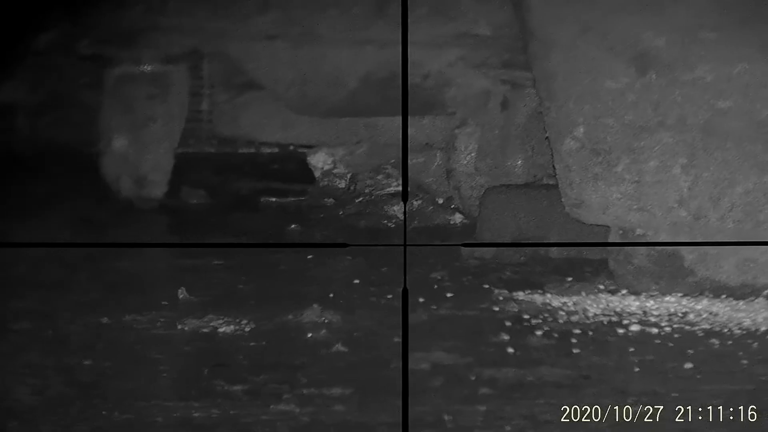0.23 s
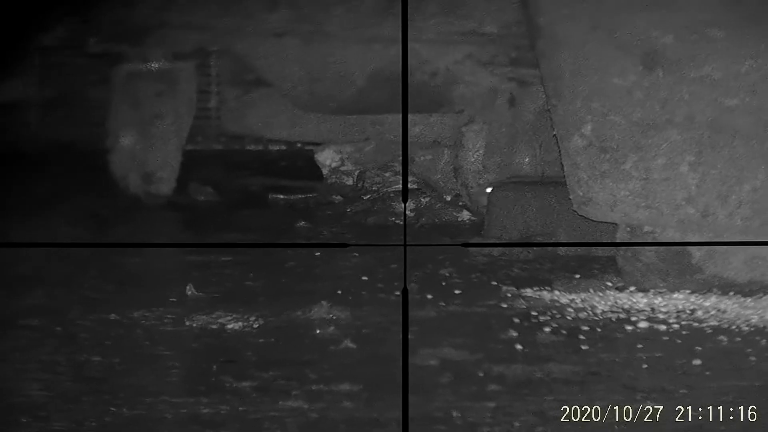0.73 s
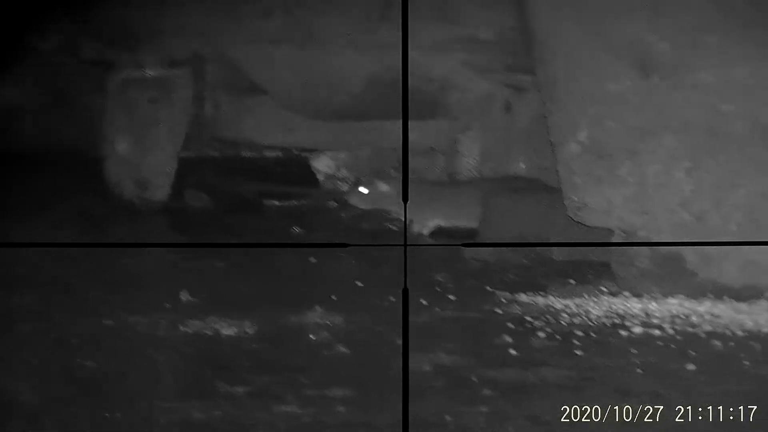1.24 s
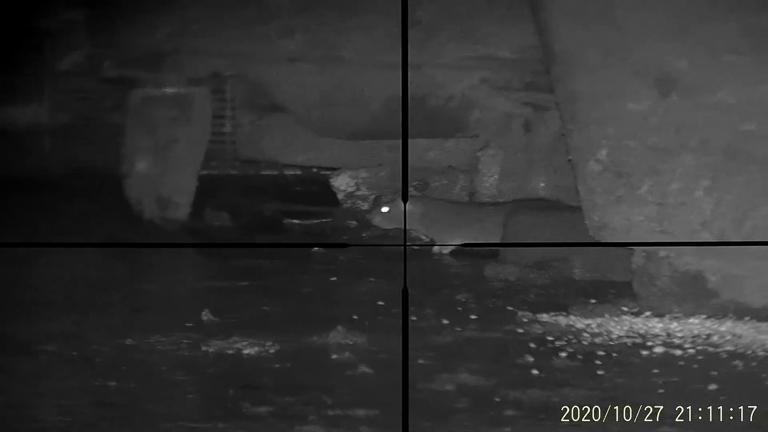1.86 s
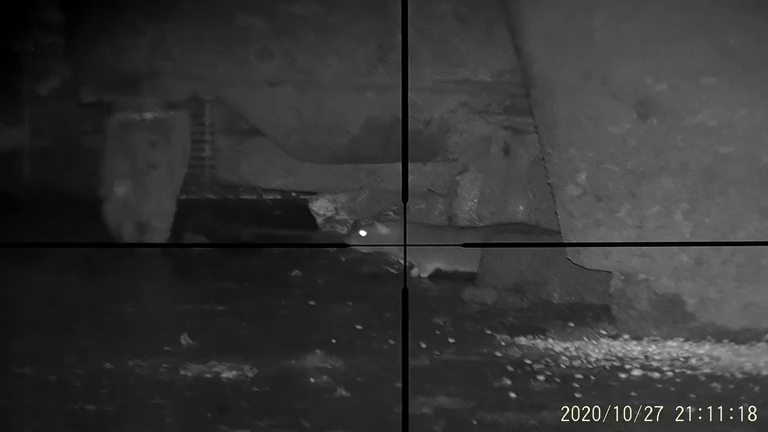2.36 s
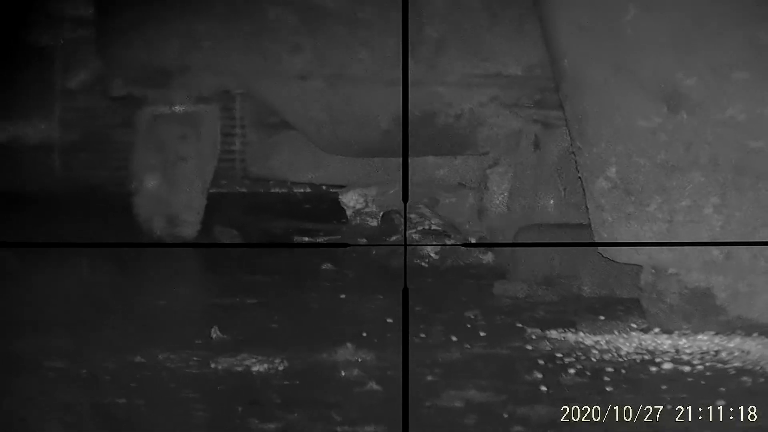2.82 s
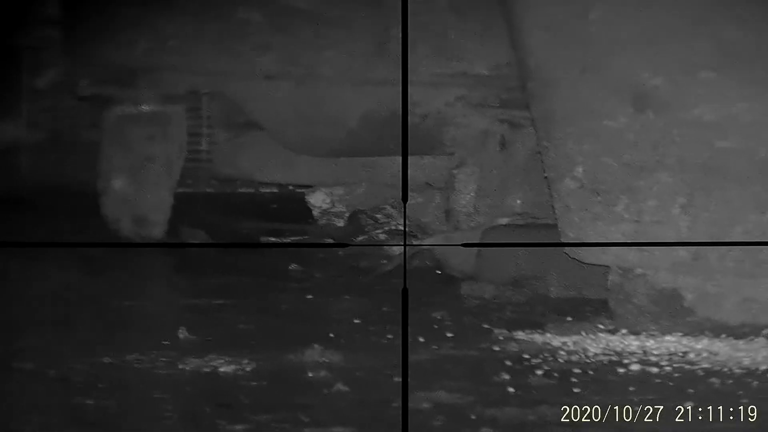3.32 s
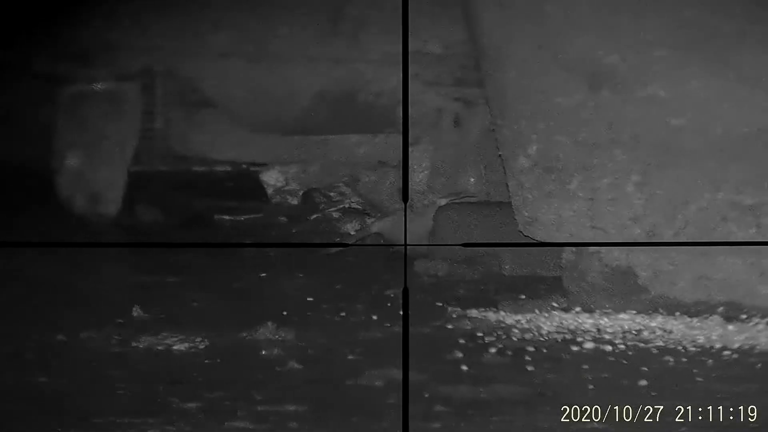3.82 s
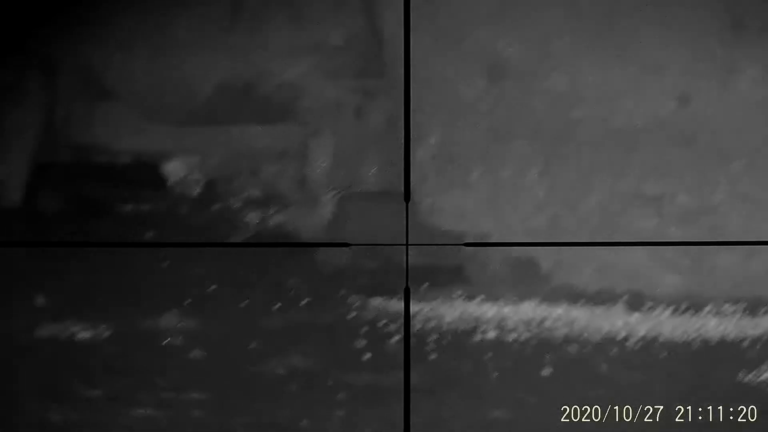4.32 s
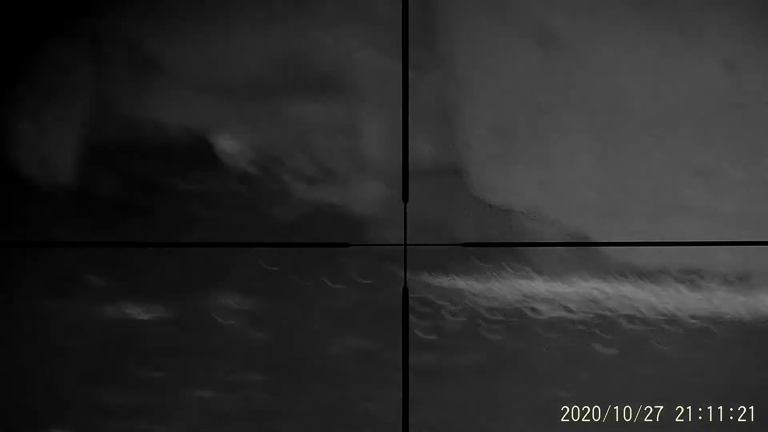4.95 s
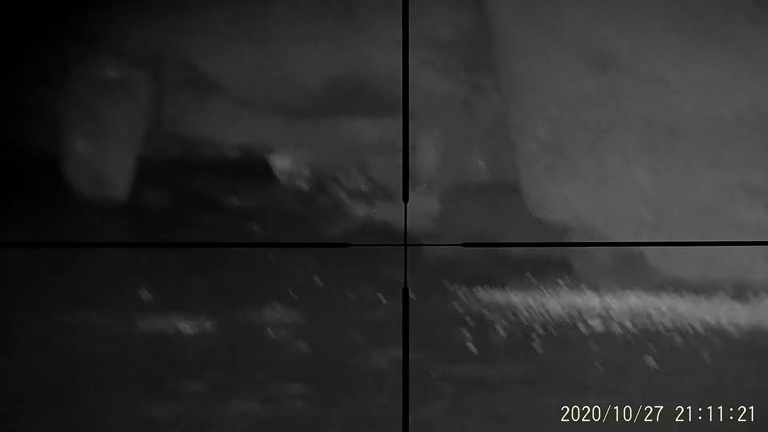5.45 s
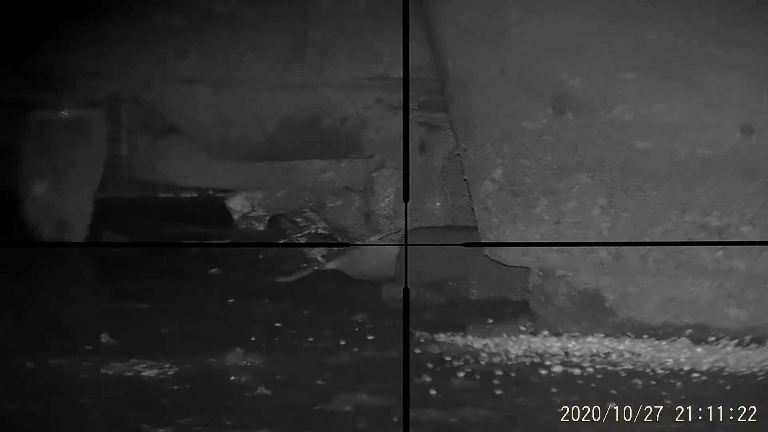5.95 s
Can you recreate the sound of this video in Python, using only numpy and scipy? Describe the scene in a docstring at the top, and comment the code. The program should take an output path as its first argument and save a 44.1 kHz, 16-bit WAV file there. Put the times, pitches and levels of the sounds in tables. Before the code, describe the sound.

Heard from a microphone mounted on the rifle, in a quiet yard at night. For the first 2.5 seconds there is only low, lumpy handling rumble, soft hush and very thin high electronic whine, with a small dull tap near 1.35 and a barely audible nudge at 2.1. At 2.57 the air rifle fires: a huge, clipped, rattling burst of air lasting under a tenth of a second, bright then dull, leaving a short hollow steel ring and shaking low rumble. The hush swells afterwards. A sharp single clack comes at 3.03, a softer one at 3.14, then faint rubs and taps from 3.55 to 4.1. From 4.28 to 4.52 the bolt is worked with scraping, hard clacks and a tiny squeal near 4.43. Lighter clicks follow around 4.65 to 4.74, another strong clatter at 4.95 to 5.03, small knocks at 5.25 to 5.4, and soft rubbing fading into rumble and hush by 6.2.

```python
"""Air rifle shot at night

In a quiet yard an air rifle with a camera scope bolted to it fires once, then its bolt is worked.
The shot is coloured noise gated by a valve and its rebounds; contacts and friction excite damped modes
of stock and action, shot and contacts ring the steel cylinder and barrel, and the bolt squeals by
stick-slip. Rumble, hush and whine lie behind; the recorder ducks its gain and clips the hardest blows."""
import sys
import numpy as np
from scipy import signal
from scipy.fft import rfft, irfft, next_fast_len
from scipy.io import wavfile
from scipy.ndimage import uniform_filter1d, map_coordinates

SR = 44100
rng = np.random.default_rng(int(sys.argv[2]) if len(sys.argv) > 2 else 0)


def wrap_up_sound(samples):
    """Save the sound to the file named by the first command line argument, as 16-bit audio."""
    columns = np.atleast_2d(samples).T
    # keep every value between -1 and 1, then stretch to whole-number steps
    tamed = np.clip(columns, -1, 1)
    steps = np.round(tamed * 32767).astype(np.int16)
    wavfile.write(sys.argv[1], SR, steps)


N = 272516
T = np.arange(N) / SR  # time of each sample, s
SHOT_S = 2.573


def amp(db):
    """Level to amplitude: 20 dB is a factor of ten."""
    return 10 ** (np.asarray(db) / 20)


def unit(x):
    """Normalization to an rms of 1."""
    return x / np.sqrt(np.mean(x ** 2) + 1e-20)


def curves(rows):
    """Linear interpolation of each column over time, then a gate that is open inside the table."""
    s, *columns = np.transpose(rows)
    return [np.interp(T, s, column) for column in columns] + [(T > s[0]) & (T < s[-1])]


def wobble(rate_hz):
    """Slow random modulation: a smooth curve through rate_hz random knots a second."""
    knots = rng.standard_normal(int(N * rate_hz / SR) + 4)
    return map_coordinates(knots, [T * rate_hz])


def filtered(x, response):
    """Linear filtering: the spectrum is multiplied by a response of frequency."""
    size = next_fast_len(N + SR // 2)
    hz = np.fft.rfftfreq(size, 1 / SR)
    return irfft(rfft(x, size) * response(hz), size)[:N]


def noise(points):
    """Spectral shaping: white noise coloured by (f/Hz, level/dB) points and brought to rms 1."""
    f, db = np.transpose(points)
    colour = lambda hz: amp(np.interp(np.log(hz + 1), np.log(f + 1), db))
    return unit(filtered(rng.standard_normal(N), colour))


# Level of the handling rumble: t/s, level/dB
HANDLING_LEVEL = [(0, -61), (1.1, -53.5), (2.1, -64), (2.6, -59), (4.2, -55.5), (6.18, -58)]
# Jolts of the rifle on its rest: t/s, level/dB
REST_JOLTS = [(2.086, -47), (2.17, -49), (4.35, -41), (4.519, -41), (5.03, -40.5)]
# Relative spectrum of the rumble: f/Hz, level per Hz/dB
RUMBLE_COLOUR = [(7.1, -26), (12, 0.5), (60, 1), (168, -9), (195, -10), (300, -18.5), (390, -53),
                 (660, -120)]
JOLT_HALF_S = 0.037
RECOIL_DB, RECOIL_DB_PER_S = -28.5, 129.5  # the rifle shakes after the shot


def handling_rumble():
    """Amplitude modulation: lumpy low noise follows the handling, the jolts and the decaying recoil."""
    level = amp(curves(HANDLING_LEVEL)[0])
    level += sum(amp(db) * np.exp(-((T - s) / JOLT_HALF_S) ** 2) for s, db in REST_JOLTS)
    level += (T > SHOT_S) * amp(RECOIL_DB - RECOIL_DB_PER_S * np.abs(T - SHOT_S))
    return level * unit(amp(3.0 * wobble(32)) * noise(RUMBLE_COLOUR))


# Relative spectrum of the yard's hush: f/Hz, level/dB
YARD_COLOUR = [(60, -26), (100, -5), (340, -5), (3760, -25.5), (7400, -26.5), (9900, -18.5), (12600, -20),
               (13500, -10.5), (14300, -21.5), (15900, -26.5)]
# Tones from the electronics of the scope: f/Hz, rms level before the swell/dB
SCOPE_WHINE = [(4032, -75.5), (8064, -72), (9297, -73.5), (13329, -66.5)]
# Gain of hush and whine, which swell after the shot: t/s, gain/dB
SWELL_GAIN = [(0, 2.5), (2.6, 1.5), (2.9, 8.5), (5.6, 8), (6.18, 1.5)]


def hush_and_whine():
    """Superposition: broadband hush and pure electronic tones rise and fall under one gain."""
    hush = amp(-59.5 + 1.2 * wobble(2.5)) * noise(YARD_COLOUR)
    whine = sum(np.sqrt(2) * amp(db + 1.4 * wobble(60)) * np.sin(2 * np.pi * hz * T)
                for hz, db in SCOPE_WHINE)
    return amp(curves(SWELL_GAIN)[0]) * (hush + whine)


# Faint brief whistles: t/s, half length/s, f/Hz, half width/Hz, level/dB
FAINT_WHISTLES = [(2.92, .008, 1380, 60, -44), (4.39, .014, 2440, 50, -33), (5.68, .03, 2900, 250, -60)]


def whistles():
    """Narrow-band filtering: noise in a band tens to hundreds of hertz wide is heard as a breathy tone."""
    out = np.zeros(N)
    for s, half_s, hz, width_hz, db in FAINT_WHISTLES:
        band = lambda f: np.exp(-((f - hz) / width_hz) ** 2)
        tone = unit(filtered(rng.standard_normal(N), band))
        out += amp(db) * np.exp(-((T - s) / half_s) ** 2) * tone
    return out


# Stick-slip rate of the bolt: t/s, slips a second f/Hz
SLIP_RATE = [(4.398, 999), (4.405, 1289), (4.416, 1415), (4.422, 1927), (4.428, 2097), (4.456, 1430),
             (4.463, 1321), (4.466, 1200)]
# Overtones of the slip rate: multiple, level/dB
SLIP_OVERTONES = [(2, -44), (3, -40), (4, -50)]
# Relative spectrum of the rasp: f/Hz, level per Hz/dB
RASP_COLOUR = [(700, -20), (2500, 0), (6500, -6), (9000, -30)]
SQUEAL_DB, PRESS_DB_PER_S, FADE_S = -12, 130.5, .004  # the grip tightens, so the level climbs
SING_HZ, SING_WIDTH_HZ, OFF_DB = 1380, 71, -25  # the action sings in this band; floor away from it
RASP_DB = -36  # grit thrown off once a slip


def squeal():
    """Stick-slip: a gliding tone peaks at the singing pitch, with weak ragged overtones and rasp."""
    hz, gate = curves(SLIP_RATE)
    gate = uniform_filter1d(gate * 1., size=round(FADE_S * SR))
    resonance = 1 / (1 + ((hz - SING_HZ) / SING_WIDTH_HZ) ** 2) + amp(OFF_DB)
    sing = amp(SQUEAL_DB + PRESS_DB_PER_S * (T - SLIP_RATE[0][0]) * gate) * resonance
    phase = 2 * np.pi * np.cumsum(hz * (1 + 0.027 * wobble(400))) / SR
    tone = sing * amp(1.1 * wobble(490)) * np.sin(phase)
    overtones = sum(amp(db + 6.9 * wobble(300)) * np.sin(k * phase) for k, db in SLIP_OVERTONES)
    rasp = amp(RASP_DB + 3.3 * wobble(100)) * (1 + np.cos(phase)) * noise(RASP_COLOUR)
    return np.sqrt(2) * gate * (tone + overtones + rasp)


def stock(x):
    """Structure-borne transmission: a short room tail blurs the sound, and stock and mount remove deep bass and
    top."""
    t = T[:SR // 3]
    colour = [(150, -30.5), (300, 2.5), (500, 4.5), (1500, -11.0), (2500, -29.5)]  # f/Hz, level/dB
    tail = noise(colour)[:len(t)] * amp(-60 * t / 0.065)
    x = x + amp(-18) * signal.fftconvolve(x, tail / np.linalg.norm(tail))[:N]
    high_pass = lambda hz: (1j * hz / (90 + 1j * hz)) ** 2
    low_pass = lambda hz: 1 / (1 - (hz / 7500) ** 2 + 1.1j * hz / 7500) ** 3
    return filtered(x, lambda hz: high_pass(hz) * low_pass(hz))


# Five groups of short resonances of stock and action, each: f/Hz, T60/s, level/dB
CLACK_MODES = [(1224, 0.022, -5), (1380, 0.026, 0)]
CLONK_MODES = [(850, .035, -3), (977.5, 0.045, 0), (1457, .4, -46), (1547, .3, -43)]
THUD_MODES = [(141, 0.094, -17), (341.9, 0.07, -4), (379.3, 0.08, 2), (400, 0.39, -11), (480.7, 0.093, 1.5)]
KNOCK_MODES = [(750, .033, 0)]
TICK_MODES = [(2823, 0.0091, 8.5), (3626, 0.011, 0), (4206, 0.0056, 2.5), (4780, 0.0059, 3.5),
              (6346, 0.014, -8)]


def ring(modes):
    """Modal superposition: the answer of damped resonances to one soft-edged tap."""
    t = T[:SR // 2]
    out = np.zeros(len(t))
    for hz, t60, db in modes:
        soft_edge = 1 - np.exp(-.8 * hz * t)
        out += amp(db - 60 * t / t60) * soft_edge * np.sin(2 * np.pi * hz * t)
    return out


# Strokes of hands and bolt: t/s, length/s, level at start/dB, level at end/dB, treble over these/dB
RUB_STROKES = [(3.555, 0.041, -48, -48, -17), (3.605, 0.068, -42.5, -43, -18), (3.754, 0.03, -50, -54, -23),
               (3.987, 0.097, -54, -43, -13), (4.288, .07, -45.5, -20.5, -10.5),
               (4.355, .11, -28.5, -25.5, -17.5), (4.485, 0.027, -24, -19.5, -9.5),
               (4.646, 0.09, -46, -40, -12), (4.955, 0.076, -29.5, -19, -8.5),
               (5.245, 0.09, -39, -50.5, -5.5), (5.33, 0.33, -54, -61, -7.5)]
RUB_IN_DB_PER_S, RUB_OUT_DB_PER_S = 2998, 700.5


def rubbing():
    """Friction excitation: gritty noise continuously shakes the resonances that the contacts strike."""
    pushes, bright = np.zeros(N), np.zeros(N)
    for s, length_s, start_db, end_db, treble_db in RUB_STROKES:
        level = np.interp(T, [s, s + length_s], [start_db, end_db])
        level -= RUB_IN_DB_PER_S * np.clip(s - T, 0, None)
        level -= RUB_OUT_DB_PER_S * np.clip(T - s - length_s, 0, None)
        pushes += amp(level)
        bright += amp(level + treble_db)
    grit = unit(rng.standard_normal(N) * amp(4.7 * wobble(300)))
    weights = ((CLACK_MODES, -2), (CLONK_MODES, -2), (THUD_MODES, -1), (KNOCK_MODES, -6))  # dB
    body = sum(amp(db) * unit(ring(modes)) for modes, db in weights)
    shaken = signal.fftconvolve(pushes * grit, body)
    shaken += signal.fftconvolve(bright * grit, unit(ring(TICK_MODES)))
    return stock(shaken[:N] / np.linalg.norm(body))


# Modes of the steel cylinder and barrel: f/Hz
STEEL_MODE_HZ = [246.2, 313.3, 407, 437, 469.3, 484.6, 570.2, 829, 939.5, 1026, 1419, 1547, 2361, 2643,
                 2817, 2939, 3547, 4950, 1174, 1712, 2455]
# For each of these modes: T60/s, level after the shot/dB, level after a contact/dB
STEEL_DECAY = [(3.2, -36, -19.5), (1.6, -30.5, -4), (1, -23, 3.5), (.36, 2, -22), (1.5, -21, -7),
               (5.15, -29, -18.5), (0.89, -3.5, -0.5), (0.41, -21.5, -18.5), (3.6, -37, -9.5),
               (0.5, -24, -31), (0.33, -9, -20), (0.11, -9.5, -5.5), (.8, -35, -30), (0.35, -20, -29),
               (.9, -25.5, -33.5), (1.4, -46, -36), (0.76, -41, -39), (0.13, -10.5, -34.5),
               (0.28, -21.5, -30), (0.24, -24.5, -30), (1, -40, -39)]
FLUTTER_DB = 3  # loose parts make each mode waver, fully from 2 kHz up and less below


def steel(column):
    """Free vibration: cylinder and barrel ring on after a blow, at the levels of the given column."""
    t = T[:4 * SR]
    flutter = wobble(30)[:4 * SR]
    modes = np.zeros(len(t))
    for hz, mode in zip(STEEL_MODE_HZ, STEEL_DECAY):
        depth_db = FLUTTER_DB * min(hz / 2000, 1) ** 2
        waver_db = depth_db * np.roll(flutter, round(9 * hz))  # shifted, so the modes waver apart
        modes += amp(mode[column] - 60 * t / mode[0] + waver_db) * np.sin(2 * np.pi * hz * t)
    return modes * (1 - np.exp(-t / 0.0025)) * np.clip(t[::-1] / .3, 0, 1)


# Contacts in the action: t/s, clack peak level before the stock/dB, then relative to the clack:
# clonk level/dB, thud level/dB, knock level/dB, tick level/dB; chatter T60/s (held to 0.002 or more)
ACTION_CONTACTS = [(1.353, -27.5, -4.5, -1.5, -19, -12, 0.046), (2.171, -49, -3, -6.5, -8, -10, 0.031),
                   (3.025, -2.5, -9, -23, -35, -9.5, 0.0058), (3.139, -22.5, 5, -8, -22, -10, 0.023),
                   (3.601, -32, -3, 1.5, -29, -12, 0.022), (3.837, -51.5, -3, 19, 7, -14.5, 0.0067),
                   (3.982, -37, 0, 2.5, -15, -18, 0.0019), (4.094, -24.5, -5, 0, -20, -1.5, 0.012),
                   (4.283, -27, -4, -4.5, -16, -12.5, .006), (4.318, -25.5, -4, -14.5, -37, -11, .008),
                   (4.338, -6.5, -3.5, -14.5, -15, -7.5, 0.045), (4.347, 5.5, -6, -8, -13.5, 1, 0.0085),
                   (4.426, -5, -1, -22.5, -26, -6, 0.0076), (4.485, -19.5, -2.5, -5, -10, -4, 0.014),
                   (4.494, -16.5, -3, 0, -3.5, -5, .013), (4.502, -9, -6.5, -27.5, -11, 0.5, 0.0052),
                   (4.516, 3.5, -14.5, -21.5, 6, 8, 0.023), (4.653, -25.5, -2, -10.5, -14.5, -21, 0.023),
                   (4.664, -10.5, -9, -4.5, -23, -7.5, 0.012), (4.693, -27.5, -3, -14.5, -20, 1.5, 0.008),
                   (4.719, -20, -3, -17.5, -31, -19, 0.027), (4.737, -29.5, -5.5, -14, -28, -4, 0.019),
                   (4.956, -9.5, -8.5, -23, -27.5, -9, 0.011), (4.968, -17, -9, -21, -20, -7, 0.018),
                   (4.983, -11, -4, -6.5, -20, -15, .015), (4.999, -6.5, 4, -13, -22, -5.5, 0.0083),
                   (5.026, 4, 3, -4, 2.5, -2.5, 0.025), (5.253, -22, -5.5, -16, -27, 5, 0.015),
                   (5.272, -11.5, -3, 0.5, -10, -3.5, 0.015), (5.304, -53, 0, 28.5, -9, -10, .006),
                   (5.394, -24.5, -3.5, 8.5, -4, -12, 0.014)]
FIRST_TAP = 5  # added to the first tap; the taps that follow are random with rms 1 before decay
RING_CLACK_DB, RING_THUD_DB = -42, -45  # how much of a clack and of a thud goes into the steel


def action():
    """Impact excitation: each contact is a short chatter of taps, heard through five mode groups."""
    out, blows, t = np.zeros(N + SR), np.zeros(N), T[:SR // 16]
    groups = [ring(g) for g in (CLACK_MODES, CLONK_MODES, THUD_MODES, KNOCK_MODES, TICK_MODES)]
    for s, db, clonk_db, thud_db, knock_db, tick_db, t60 in ACTION_CONTACTS:
        start = round(s * SR)
        chatter = amp(-60 * t / max(t60, .002)) * rng.standard_normal(len(t))
        chatter[0] += FIRST_TAP
        push = np.abs(chatter)  # the wood feels the force of the blow, not its grain
        levels = (0, clonk_db, thud_db, knock_db, tick_db)
        forces = (chatter, chatter, push, chatter, chatter)
        for group, level, force in zip(groups, levels, forces):
            sound = signal.fftconvolve(group, force)
            out[start:][:len(sound)] += amp(db + level) * sound / np.abs(sound).max()
        blows[start] = amp(db + RING_CLACK_DB) + amp(db + thud_db + RING_THUD_DB)
    return stock(out[:N]) + signal.fftconvolve(blows, steel(column=2))[:N]


# Relative spectrum of the blast: f/Hz, level/dB
BLAST_SPECTRUM = [(24, -68.5), (40, -41.5), (130, -44), (200, -40), (277, -1.5), (620, -10.5), (710, 1),
                  (866, -20), (1320, -2), (1610, -28.5), (2100, -29), (2750, -15), (3600, -24),
                  (4900, -22.5), (6140, -24), (8300, -37), (9500, -62)]
# Hammer and valve rebounds: t/s
REBOUND_TIMES = [2.573, 2.578, 2.583, 2.589, 2.599, 2.608, 2.615, 2.621]
REBOUND_S, REBOUND_DECAY_S = 0.00018, 0.00064  # rise and decay constant of each rebound
LEAD_S, LEAD_DB = .007, -14.5  # a hiss of the opening valve runs ahead of the shot
BLAST_DB, BUILD_DB, HOLD_S = 22, 3.5, .03  # level before the rattle; starts BUILD_DB lower, builds in HOLD_S
CLOSE_S = .045  # the valve shuts ever faster, 60 dB down after this time
TAIL_DB, TAIL_DB_PER_S = 1, 200  # the escaping air dies slowly
TREBLE_DB, DULL_DB_PER_S = 7, 152.5  # the blast starts bright and dulls


def shot():
    """Turbulent jet noise: a rattling blast far above what the recorder can hold, then the steel ring."""
    t = T - SHOT_S
    after = np.clip(t - HOLD_S, 0, None)
    build_db = BUILD_DB * np.clip(1 - t / HOLD_S, 0, 1) ** 2
    valve = amp(BLAST_DB - build_db - 60 * (after / CLOSE_S) ** 2)
    escape = amp(TAIL_DB - TAIL_DB_PER_S * after)
    lead = amp(LEAD_DB) * np.clip(1 + t / LEAD_S, 0, 1) * (t <= 0)
    level = (t > 0) * (valve + escape) + lead
    air = noise(BLAST_SPECTRUM)
    low = filtered(air, lambda hz: 1 / (1 + (hz / 1900) ** 6))
    rattle = 0.1 * amp(1.8 * wobble(160))  # unsteady floor between the rebounds
    for s in REBOUND_TIMES:
        decay = np.exp(-np.clip(T - s, 0, None) / REBOUND_DECAY_S)
        rattle += decay * np.clip((T - s) / REBOUND_S, 0, 1)
    treble = amp(TREBLE_DB - DULL_DB_PER_S * np.clip(t, 0, HOLD_S)) * (air - low)
    blast = level * (np.sqrt(rattle) * low + rattle * treble)  # the treble rattles more deeply
    return blast + np.pad(steel(column=1), (round(SHOT_S * SR), 0))[:N]


def scene():
    """Linear superposition of the background, the worked action and the shot."""
    background = handling_rumble() + hush_and_whine() + whistles()
    return (background + squeal() + rubbing() + action() + shot())[None]


def smoothed(x, time_s):
    """Exponential averaging with the given time constant."""
    keep = np.exp(-1 / (time_s * SR))
    return signal.lfilter([1 - keep], [1, -keep], x)


def record(dry):
    """Dynamic range control: slow gain ducking, hard clipping, a duller top octave and a band limit."""
    x = dry[0]
    power = smoothed(x ** 2, .02)
    over_db = np.maximum(10 * np.log10(power + 1e-12) + 9, 0)  # loudness over the -9 dB threshold
    release_db = 120 * T  # the gain comes back at a steady 120 dB/s
    cut_db = np.maximum.accumulate(over_db + release_db) - release_db
    x = x * amp(-smoothed(cut_db, .014))  # it follows late, so the blow still clips
    x = x / (1 + np.abs(x / .96) ** 10) ** (1 / 10)
    shelf_db = lambda hz: -12 / (1 + (8900 / (hz + 1)) ** 12)
    return filtered(x, lambda hz: amp(shelf_db(hz)) * (hz < 15900))[None]


dry = scene()
out = record(dry)
wrap_up_sound(out)
```